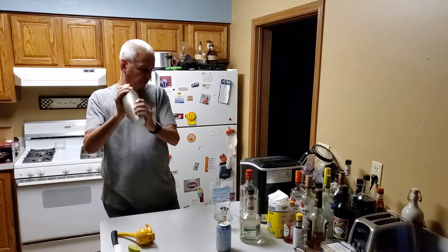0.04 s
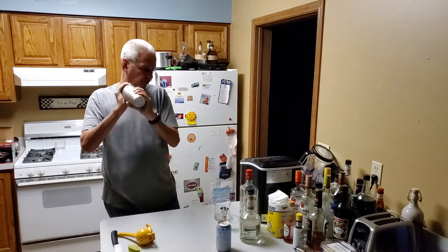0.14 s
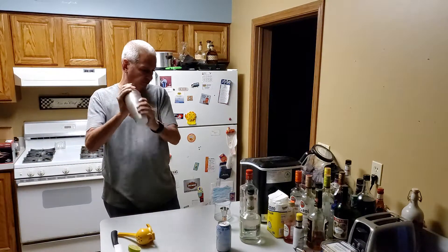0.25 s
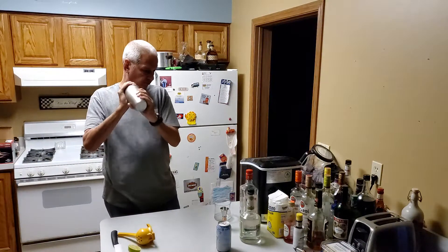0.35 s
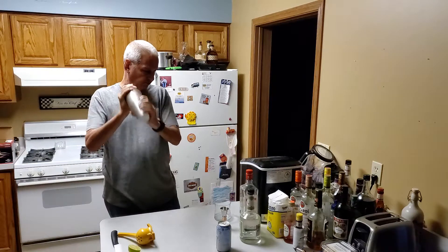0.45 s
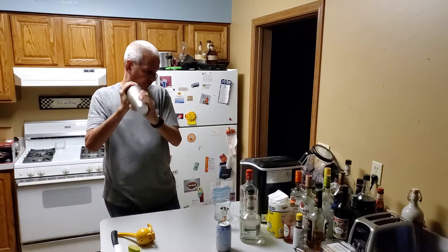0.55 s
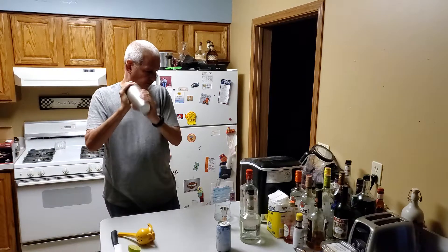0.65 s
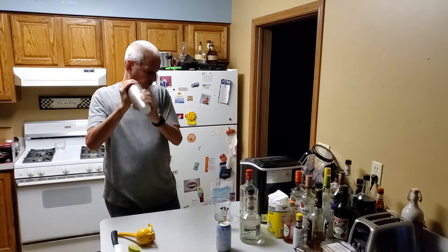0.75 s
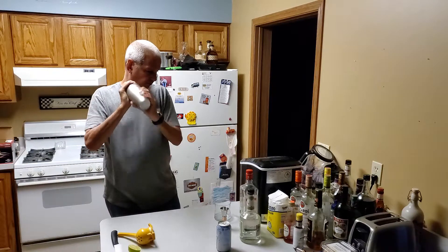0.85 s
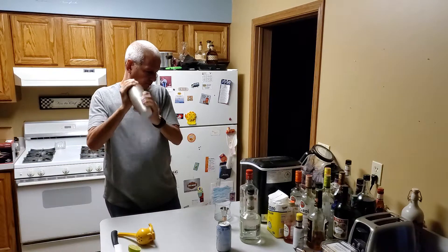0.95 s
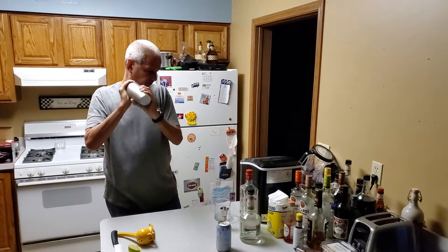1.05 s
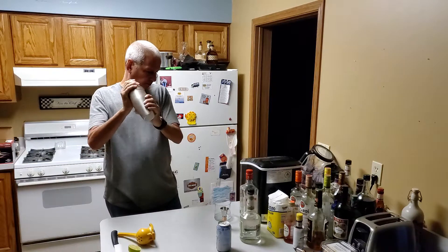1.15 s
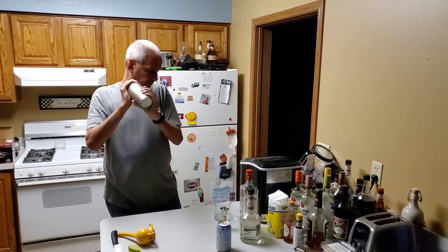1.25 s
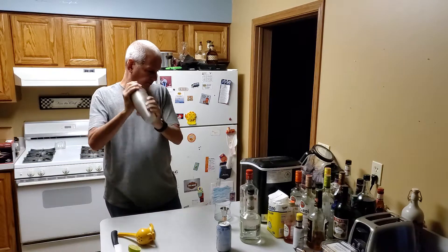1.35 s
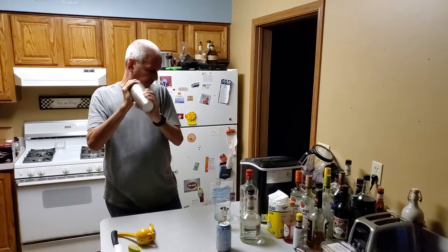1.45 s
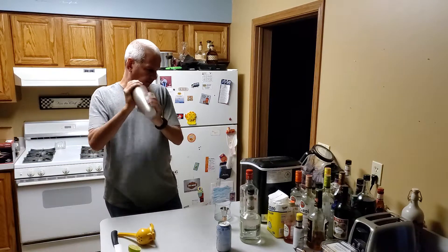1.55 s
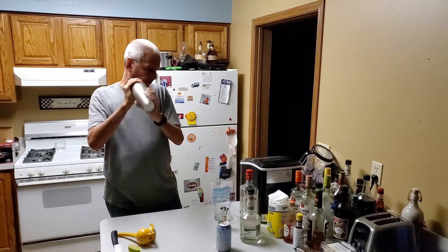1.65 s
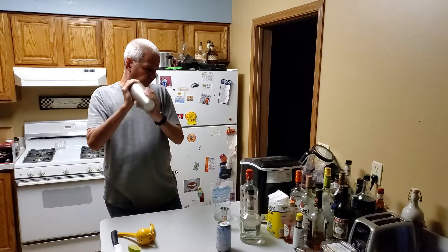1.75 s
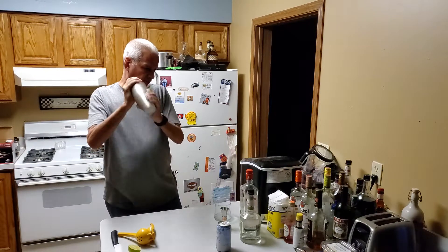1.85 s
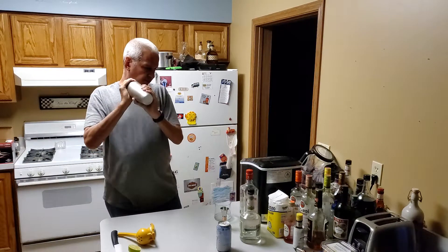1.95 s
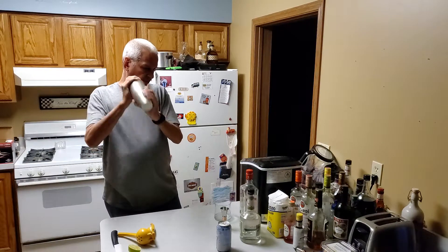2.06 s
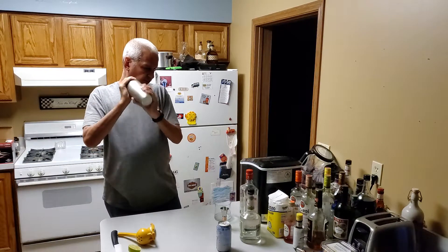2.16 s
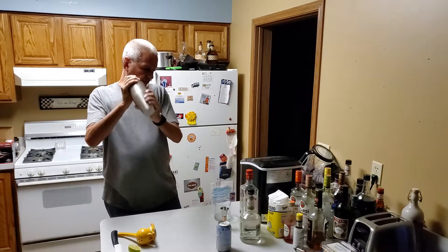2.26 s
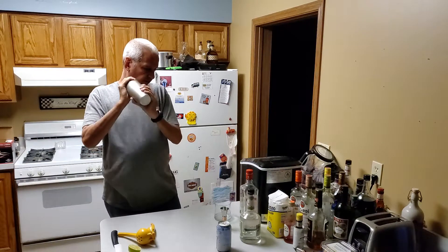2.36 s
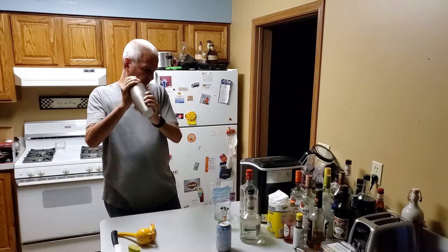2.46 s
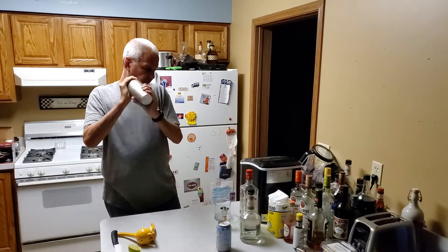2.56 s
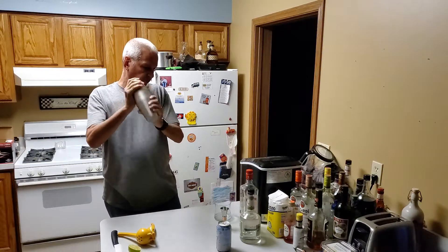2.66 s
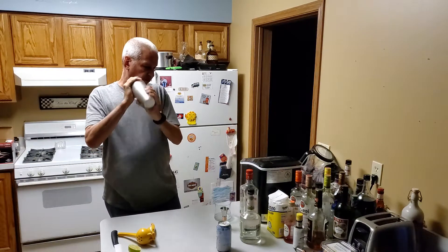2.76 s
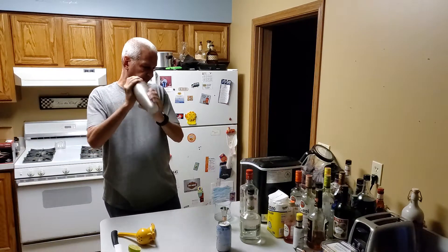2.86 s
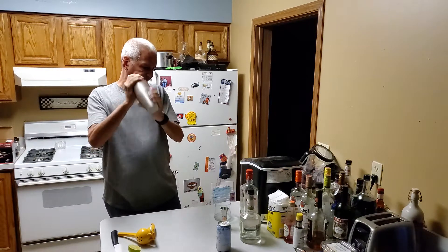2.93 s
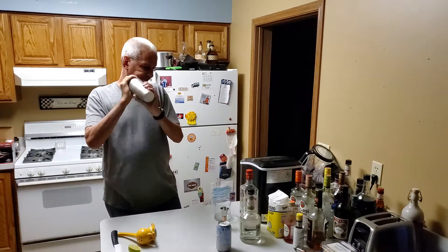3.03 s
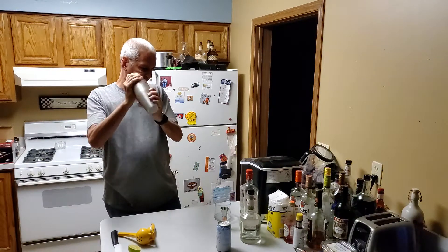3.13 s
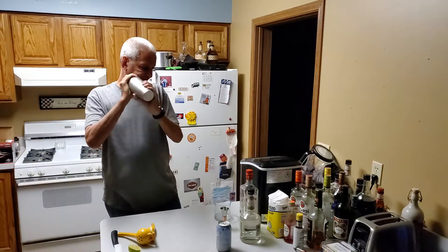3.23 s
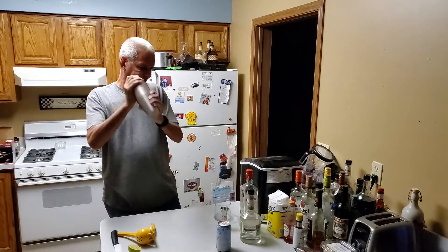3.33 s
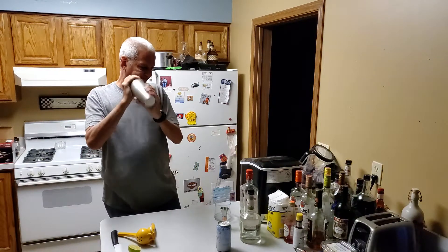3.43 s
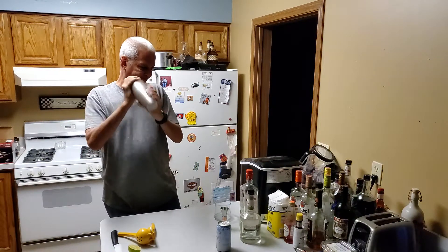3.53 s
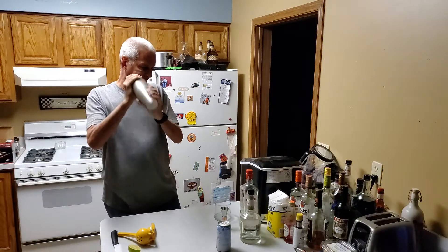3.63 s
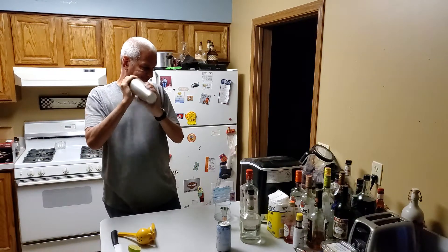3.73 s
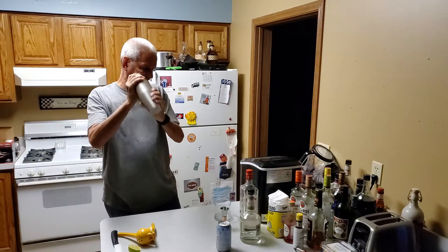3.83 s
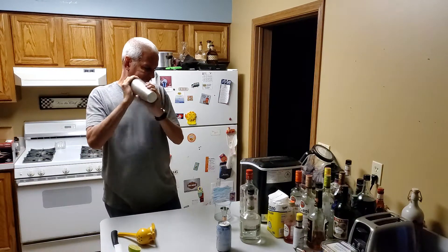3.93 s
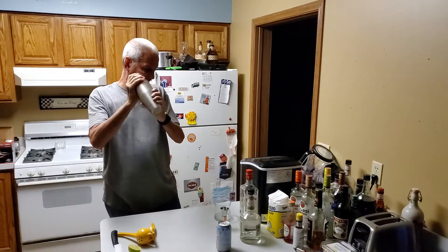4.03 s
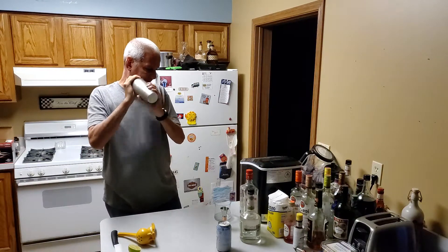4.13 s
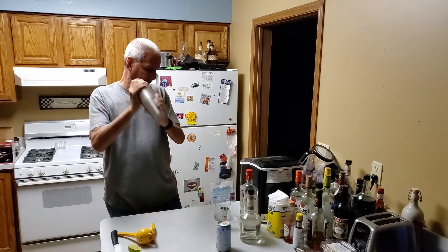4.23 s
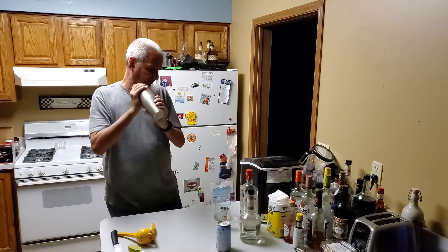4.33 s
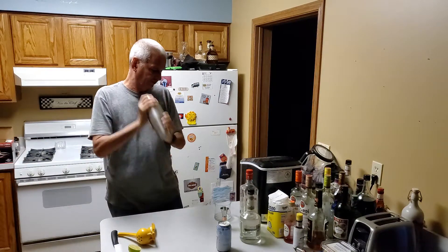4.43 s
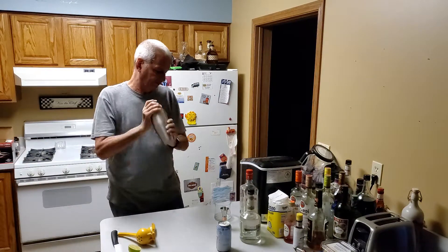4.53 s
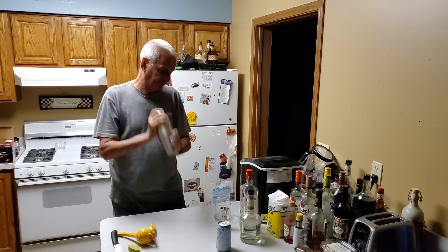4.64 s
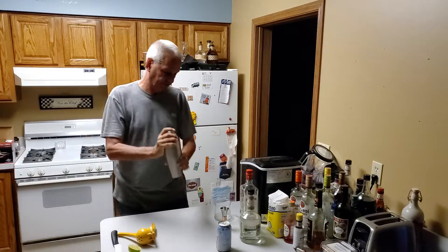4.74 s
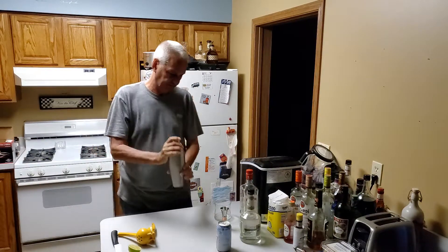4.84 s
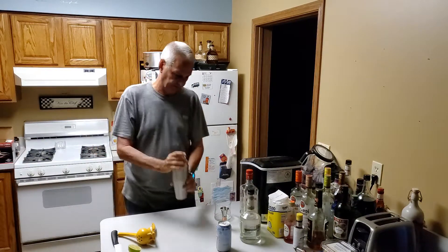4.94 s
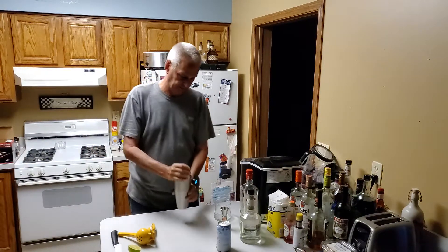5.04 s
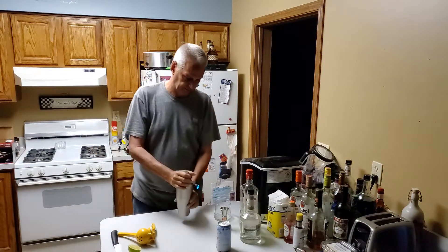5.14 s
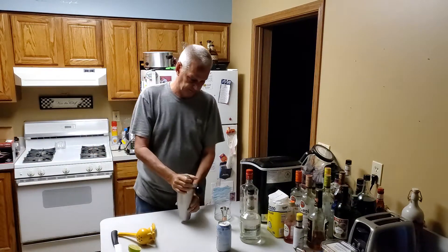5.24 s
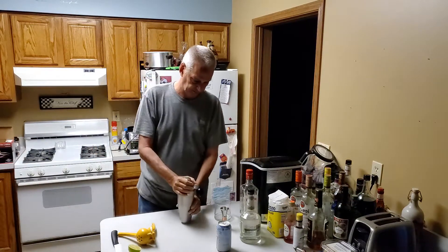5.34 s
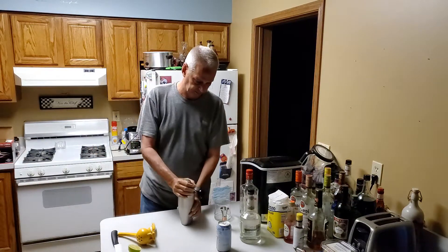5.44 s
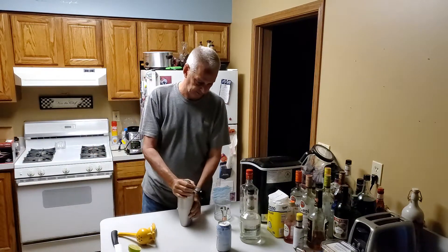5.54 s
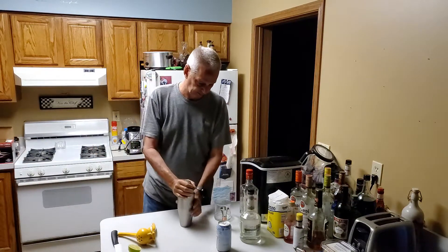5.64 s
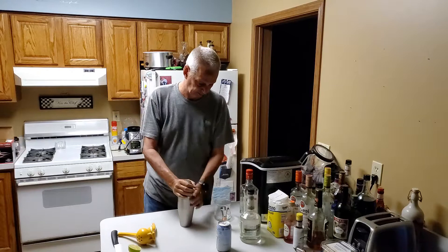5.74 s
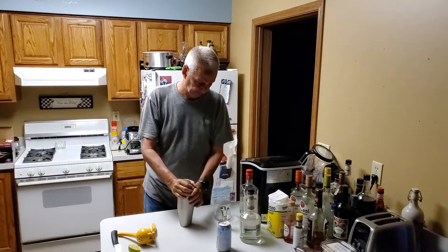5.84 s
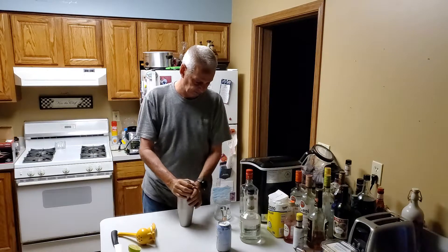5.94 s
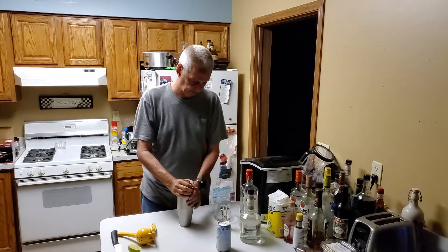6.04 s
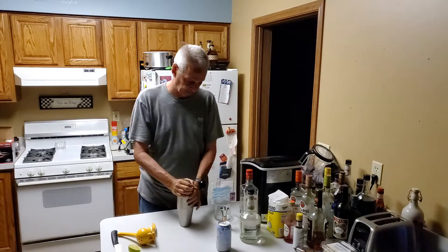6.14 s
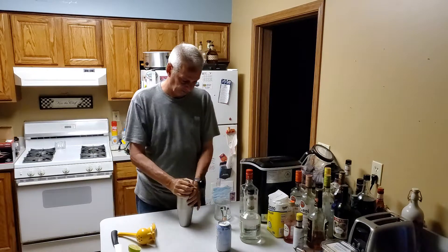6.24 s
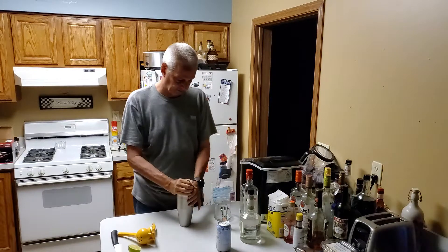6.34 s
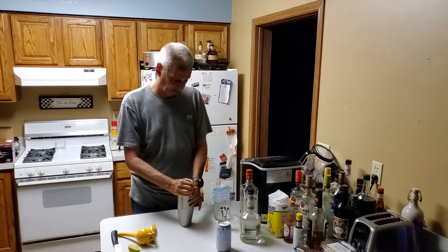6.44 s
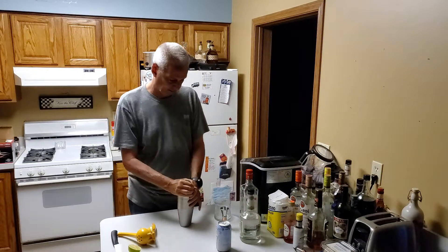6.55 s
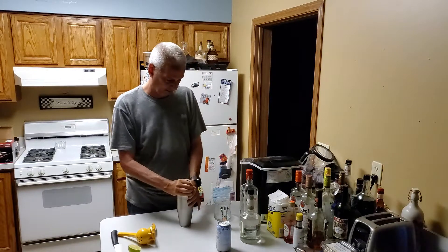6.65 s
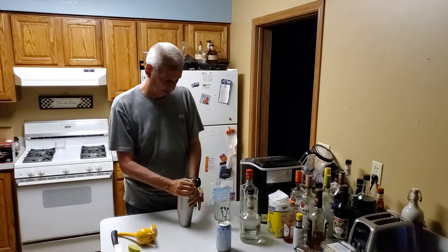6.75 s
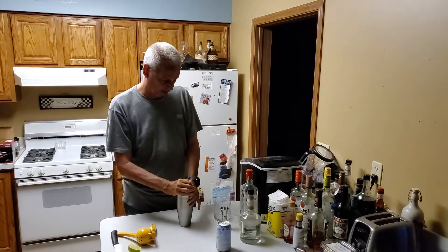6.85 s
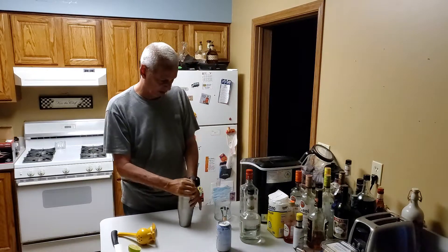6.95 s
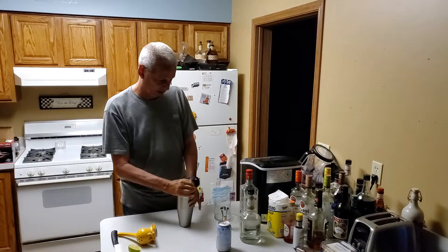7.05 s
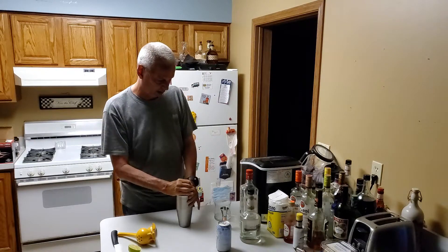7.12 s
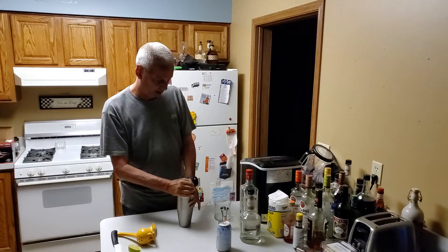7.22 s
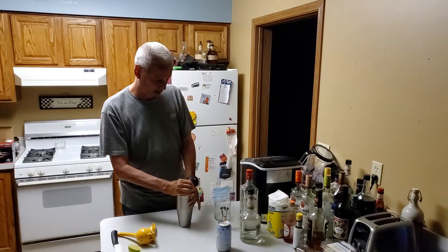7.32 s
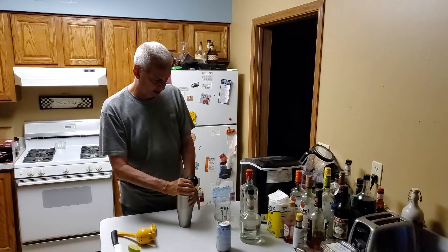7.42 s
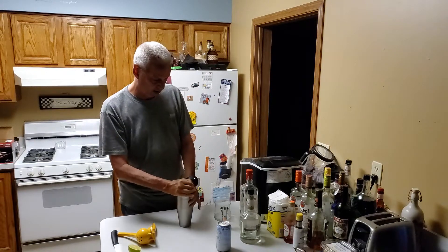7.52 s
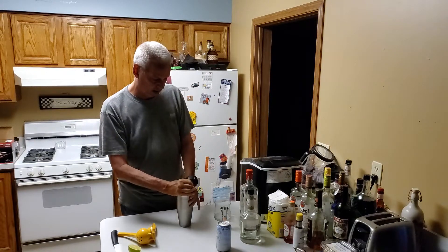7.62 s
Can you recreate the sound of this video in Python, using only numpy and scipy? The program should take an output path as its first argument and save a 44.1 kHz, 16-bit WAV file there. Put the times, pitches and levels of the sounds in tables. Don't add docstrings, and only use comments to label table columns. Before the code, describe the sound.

Ice cubes slam back and forth in a metal shaker, roughly four full shakes a second, crisp, bright and loud, with high pinging clinks over a dense patter. The shaking breaks off, a few cubes clink softly, then the base thuds on the counter and rocks with light knocks and tiny cap clicks. Small stereo microphones, lively kitchen, low refrigerator hum behind.

```python
import sys
import numpy as np
from scipy import signal
from scipy.fft import rfft, irfft
from scipy.io import wavfile
from scipy.ndimage import uniform_filter1d

SR = 44100
rng = np.random.default_rng(int(sys.argv[2]) if len(sys.argv) > 2 else 0)


def dump_mix(stems):
    frames = np.atleast_2d(stems).T
    limited = np.clip(frames, -1, 1)
    pcm = np.round(limited * 32767).astype(np.int16)
    wavfile.write(sys.argv[1], SR, pcm)


def invert_db(x):
    u = np.asarray(x, float) / 20
    return 10 ** u


N = 338670

# (frequency [Hz], level [dB per Hz])
AIR_SPECTRUM = [(30, -21), (45, -20), (70, -1), (100, -23.5), (140, -8.5), (300, -10.5), (600, -12),
                (740, -14), (830, -18.5), (1900, -27.5), (3500, -38), (6000, -46.5), (11000, -39.5),
                (16000, -52)]
AIR_DB = -53
# (frequency [Hz], rms level [dB])
HUM = [(58.12, -54), (58.91, -65), (47.6, -65)]
HUM_TRIM = [0., 0.5, -10.5]
# (multiple of the hum, rms level [dB])
HUM_ORDERS = [(6, -65), (8, -104), (9, -65), (10, -65.5), (12, -69.5)]
# (frequency [Hz], rms level [dB])
WHINES = [(711, -69.5), (973, -71.5), (6860, -85)]
BEAT_S = 0.22

# (time [s], level [dB])
TUMBLE = [(0.0, -30.5), (0.41, -15.5), (0.83, -20), (1.24, -21), (1.92, -20), (2.22, -16.5), (2.8, -20.5),
          (2.95, -26.5), (3.3, -21), (3.61, -17.5), (4.32, -18), (4.62, -17), (4.8, -29), (5.02, -28.5),
          (5.22, -57), (6.08, -60.5), (6.25, -64.5), (7.68, -57.5)]
# (frequency [Hz], level [dB])
CHIP_COLOUR = [(1300, -45), (1700, 16.5), (2300, 2.5), (3200, 6), (5000, -6), (8000, -7.5), (12000, -9),
               (16000, -17.5)]
DULL_DB, DULL_FOLLOW = -29.5, 0.75
CRACK_TONE_DB = 3.5

# (time [s], chips [dB], ring [dB], ring centre [Hz], breadth [octaves])
BASE_HITS = [(0.0, -14.5, -19.5, 995, 0.39), (0.187, -8.5, -4.5, 1530, 0.45),
             (0.402, -9.5, -2, 1450, 0.089), (0.642, -12.5, -12.5, 1590, 0.24),
             (0.831, -9.5, -12, 1690, 0.06), (1.072, -12, -13.5, 1150, 0.54),
             (1.272, -15.5, -18, 1650, 0.93), (1.538, -28, -14.5, 1360, 0.61),
             (1.736, -17, -21.5, 1100, 0.42), (1.939, -6.5, -6, 1850, 0.4),
             (2.179, -13.5, -4.5, 1150, 0.88), (2.375, -12, -28, 1660, 1),
             (2.632, -20.5, -19.5, 1070, 0.73), (2.827, -8.5, -3.5, 1330, 0.19),
             (3.076, -12.5, -7.5, 1303, 0.11), (3.301, -23, -12.5, 1200, 1),
             (3.525, -14.5, -12.5, 1510, 0.32), (3.727, -14, -14, 1320, 0.15),
             (3.96, -9.5, -12.5, 1460, 0.97), (4.186, -10, -15, 1340, 0.38), (4.405, -10, -7, 1450, 0.25),
             (4.623, -15, -12.5, 2340, 0.41)]
BASE_DULL_DB, BASE_CRACK_DB, BASE_UPPER_DB = -8, -6, -5
TIGHT_S, LOOSEN = 0.013, 0.3
# (time [s], chips [dB], spread [s], first crack [dB])
CAP_HITS = [(0.1015, -16, 0.096, -9), (0.2778, -10.5, 0.031, -11), (0.53, -13.5, 0.0093, -6),
            (0.715, -16.5, 0.11, -3.5), (0.935, -13, 0.045, -27), (1.1643, -19, 0.042, -18),
            (1.4056, -10.5, 0.019, -37), (1.522, -9, 0.013, -25), (1.6337, -20, 0.073, -14),
            (1.8255, -10, 0.014, -26), (2.0606, -9, 0.012, -21), (2.328, -21, 0.051, -16),
            (2.5015, -17, 0.037, 1), (2.7348, -15, 0.01, 4.5), (2.958, -16.5, 0.075, -8),
            (3.156, -14, 0.041, -10), (3.381, -7, 0.0063, -2), (3.6686, -19, 0.025, -5),
            (3.839, -26, .038, -12), (4.064, -17.5, 0.048, 1.5), (4.2975, -19.5, 0.028, -13),
            (4.5011, -10, 0.012, -9), (4.7265, -11.5, 0.027, -22), (4.834, -20, 0.041, -17)]
CAP_DULL_DB = -9.5
# (time [s], chips [dB], dull against bright [dB], spread [s])
STRAYS = [(0.0677, -26, -26, .01), (0.0767, -12.5, -14, 0.013), (0.853, -22.5, -12, .01),
          (1.02, -18, -30, .01), (1.0572, -12.5, -13, 0.014), (1.8142, -17, -16.5, .01),
          (4.1958, -14, -17, .012), (4.33, -24, -25, 0.0098), (4.4165, -25.5, -7.5, 0.013),
          (0.159, -21, -25, 0.079), (0.383, -28, -2, 0.035), (0.57, -21, -9, 0.055),
          (0.598, -18, -14, 0.013), (0.795, -15, -13, 0.017), (1.215, -12, -20.5, 0.015),
          (1.389, -19.5, -10.5, 0.07), (1.597, -18.5, -26.5, 0.035), (1.7094, -15.5, -11, 0.026),
          (1.869, -14.5, -11, 0.031), (2.6463, -43, -18, 0.011), (2.828, -14, -22, .004),
          (2.7675, -19.5, -8.5, 0.016), (3.1794, -11, -22, 0.01), (3.27, -22.5, -3, 0.02),
          (3.317, -12.5, -12, 0.0069), (3.475, -18.5, -14, .06), (3.8257, -14.5, -11, 0.022),
          (4.392, -38, -6, .02)]
STRAY_CRACK_DB = 2
# (time [s], peak level [dB], dull against bright [dB])
TICKS = [(5.0443, -32.5, 5), (5.15, -37, 7), (5.276, -45, -3), (5.379, -42.5, -3), (5.4282, -40, -2.5),
         (5.5765, -45, 1), (5.708, -56, 0), (5.744, -59, 10.5), (5.828, -43.5, 3), (5.924, -61, 12),
         (5.956, -41, -22), (6.349, -60, -9), (6.3887, -40.5, -4.5), (6.555, -51, 0), (6.675, -51, 9),
         (6.823, -49.5, 2), (6.8886, -56, 7), (7.0624, -41, -8), (7.1335, -64, -10), (7.1893, -41.5, -5),
         (7.432, -44, -6), (7.598, -45, 2), (7.602, -45, 5.5)]
TICK_S, TICK_CRACK_DB = 0.0062, -4.5

# (frequency [Hz], level [dB], T60 [s])
SHELL_MODES = [(467, -7.5, 0.027), (700, -7.5, 0.03), (970, -0.5, 0.056), (1154.5, 13, 0.041),
               (1360, 4.5, 0.027), (1450, 11.5, 0.023), (1536, 18, 0.015), (1660, 13, 0.02),
               (1850, 7.5, 0.033), (2113, 5.5, 0.047), (2230, 12.5, 0.018), (2660, 6, 0.023),
               (2876, 4.5, 0.046), (3190, 7, 0.027)]
# (time [s],
# ring [dB], ring centre [Hz])
GLANCES = [(0.4025, -16, 1340), (0.601, -18, 1610), (0.774, -17, 2470), (1.128, -38, 1600),
           (1.940, -31.5, 2600), (2.1805, -21.5, 2500), (2.828, -20, 2600), (3.033, -19.5, 1710),
           (3.189, -19, 2260), (3.66, -19.5, 1660), (3.864, -21.5, 1920), (4.727, -15, 2590),
           (0.834, -13, 1580), (3.382, -32, 2400), (4.502, -30, 2300)]
GLANCE_OCTAVES, GLANCE_UPPER_DB = 0.18, 11
# (time [s], ring [dB], ring centre [Hz])
THUDS = [(0.2, -22, 606), (0.415, -30, 600), (1.541, -25.5, 520), (1.96, -18.5, 660), (2.192, -19.5, 605),
         (3.31, -28, 640), (3.527, -24.5, 520), (3.74, -28, 600), (3.97, -25, 700), (4.2, -34, 600),
         (4.63, -27, 790)]
THUD_OCTAVES, THUD_UPPER_DB = 0.42, -27
MUFFLE_S, MUFFLE_HZ, MUFFLE_DB = 4.95, 9000, -16

# (frequency [Hz], T60 [s])
KITCHEN_T60 = [(100, 0.56), (500, 0.5), (1500, 0.41), (4000, 0.56), (10000, 0.21), (16000, 0.11)]
# (frequency [Hz], correlation [-1 to 1])
LIKENESS = [(60, 0.77), (180, 1), (550, 0.67), (1650, -0.11), (4970, -0.03), (15000, -0.0017)]
WALL_S, WALL_DB = [0.0128, 0.015], -10.5
SWAP_S = 0.17

# (multiple of the pitch, level [dB], multiple of the T60)
CLINK_MODES = [(.92, -25, .7), (1, -4.5, 1), (1.06, -15, 0.97), (1.45, -33.5, .6), (1.95, -15, 0.54)]
# (time [s], peak level [dB], pitch [Hz])
NECK_CLINKS = [(0.07, -27, 6670), (0.1605, -23, 6650), (0.188, -13, 6700), (0.2767, -15, 5880),
               (0.297, -16.5, 7170), (0.3855, -22, 6660), (0.401, -20.5, 6650), (0.5325, -9, 5230),
               (0.5696, -17, 6760), (0.598, -14.5, 5130), (0.7145, -17, 6500), (0.7911, -12.5, 6760),
               (0.7986, -17, 6600), (0.9395, -17, 7000), (1.057, -19, 6830), (1.1673, -14, 5970),
               (1.1826, -16, 6700), (1.3877, -19, 6200), (1.408, -11, 6510), (1.4127, -5, 5500),
               (1.5978, -25, 6690), (1.6347, -12, 6550), (1.711, -22, 6700), (1.8113, -14, 6470),
               (1.8302, -13, 6090), (1.8712, -12, 6380), (1.937, -27, 6360), (2.059, -8, 5970),
               (2.0782, -23, 6520), (2.1904, -24, 4950), (2.3795, -28, 6870), (2.4992, -21, 6700),
               (2.4998, -11, 6170), (2.6454, -12, 5220), (2.7347, -10.5, 6400), (2.7696, -15, 6230),
               (2.826, -27, 5900), (2.957, -12, 6360), (3.1557, -15, 5350), (3.1792, -14, 5270),
               (3.268, -30, 5750), (3.3189, -21, 5870), (3.3827, -25, 6500), (3.3844, -15, 6660),
               (3.6701, -14, 6500), (3.701, -13, 6510), (3.7224, -18, 6540), (3.826, -12, 5970),
               (3.8404, -7.5, 6870), (3.9589, -29, 6330), (4.0654, -14, 6700), (4.2048, -24, 5570),
               (4.3173, -15, 6700), (4.394, -19, 6070), (4.5027, -28, 6280), (4.5101, -16, 6700),
               (4.7272, -14, 6550), (4.8314, -18.5, 6140)]
# (time [s], peak level [dB], pitch [Hz])
NECK_RATTLE = [(0.2763, -14.5, 5880), (0.2962, -18, 7100), (1.4174, -12, 6960), (1.4214, -12, 6700),
               (1.4264, -17, 6100), (1.4334, -13, 6240), (1.4384, -20, 5670), (2.0834, -14, 6540),
               (3.1557, -13, 5350), (3.1854, -16, 6520), (3.1974, -22, 5520), (3.3874, -15, 7320),
               (3.3934, -15, 6690), (3.5274, -15, 6330), (4.5234, -19, 6650), (4.7272, -16, 6550),
               (4.7654, -17, 6950), (4.9244, -29, 6310)]
NECK_T60_S, NECK_DB = 0.0059, -4.5
# (time [s], peak level [dB], pitch [Hz])
SHOULDER_CLINKS = [(0.0777, -29, 2270), (0.5327, -9, 3280), (0.82, -32, 1570), (1.4162, -18, 3060),
                   (1.4334, -18, 1720), (2.0697, -17, 3360), (2.5042, -11, 2320), (2.6618, -36, 3080),
                   (2.7324, -25.5, 1700), (3.0325, -17, 3390), (3.1104, -21, 3470), (3.1877, -20, 3180),
                   (3.4994, -24, 2240), (3.6177, -29, 2230), (3.7065, -31, 1490), (3.8227, -11, 3370),
                   (3.9739, -14, 2160), (4.1944, -14, 1380), (4.3374, -16, 3430), (4.4044, -31, 1510),
                   (4.5241, -11, 3240), (4.7794, -26, 1630), (4.8594, -21, 1500), (4.8994, -20, 2300),
                   (4.9944, -17.5, 1900)]
SHOULDER_T60_S, SHOULDER_DB = 0.012, -3
# (time [s], peak level [dB], pitch [Hz])
FREE_CLINKS = [
    (4.6226, -36, 2270),
    (4.648, -17.5, 2220),
    (5.0445, -32.5, 1670),
    (5.1190, -37, 1860),
    (5.1495, -36, 1740),
]
FREE_T60_S = 0.046
# (time [s], peak level [dB], pitch [Hz])
CAP_CLICKS = [(5.3793, -36, 2390), (5.4296, -38, 2860), (5.7423, -59, 2350), (5.8267, -42, 3460),
              (5.9244, -53, 2680), (5.278, -51, 1790), (5.709, -43, 1630), (5.831, -46, 2020),
              (5.955, -49, 1820), (6.201, -56, 1920), (6.617, -49, 1680), (7.134, -53, 1940),
              (7.189, -46.5, 3290), (7.324, -35, 1840), (7.441, -52, 3500), (6.3875, -45, 2890),
              (6.5545, -50, 3130), (6.8259, -41, 3070), (7.0600, -40, 3190), (7.4333, -44, 3320)]
GRIP_T60_S, CHATTER_S = 0.0055, 0.0033

# (time [s], peak level [dB], hardness [dB], boom [dB], favoured ring [Hz])
KNOCKS = [(5.573, -17, -28, -20, 340), (5.685, -47, -32, -12, 200), (6.39, -41.5, -24, -15, 300),
          (6.678, -29.5, -34, -17.5, 282), (6.827, -42, -22, -15, 300), (6.904, -31.5, -21, -25, 262),
          (6.941, -43.5, -40, -8, 200), (7.195, -34, -34, -8, 240), (7.204, -32, -21, -13, 296),
          (7.221, -34, -40, 3, 230), (7.443, -34.5, -32, -12, 398), (7.469, -46, -18, -9, 250),
          (7.484, -45, -40, -12, 198), (7.602, -15.5, -18, -20, 260)]
# (frequency [Hz], level [dB], T60 [s])
COUNTER_MODES = [(93.4, 5, 0.38), (137, 4, 0.28), (250, 1, 0.12), (321, 8.5, 0.034), (386, -1, 0.063),
                 (447, 1, 0.05), (520, 4.5, 0.041), (605, 9, 0.04), (727, 2, 0.056), (867, 0.5, 0.094),
                 (1150, 7, 0.021), (1660, 7.5, 0.0073), (2090, 4.5, 0.005), (2830, -8, 0.0024)]
KNOCK_SPREAD_S, KNOCK_CONTACT_S = 0.006, 0.0006
KNOCK_HOLD_S, KNOCK_FALL_DB_PER_S = 0.052, -500

# (frequency [Hz], level [dB])
LEFT_PORT = [(500, -2.5), (2000, -1.5), (3100, 4), (5000, 0.5), (7800, 4.5), (9200, -6.5), (12000, -5),
             (16000, 1.5)]
# (frequency [Hz], level [dB])
RIGHT_PORT = [(2000, -0.5), (5000, 2.5), (6500, 6), (7600, 1), (8800, 1), (9600, 7), (11500, 5.5),
              (13500, 2.5)]
LEFT_LAG, DOWN_LAG, DOWN_S = 6, 3, 5.25


def evened(x):
    return x / np.sqrt(np.mean(x ** 2) + 1e-20)


def read(points, hz):
    f, value = np.transpose(points)
    return np.interp(np.log(hz + 1), np.log(f + 1), value)


def add(mix, s, sound):
    part = mix[round(s * SR):][:len(sound)]
    part += sound[:len(part)]


def high_pass(x, order, hz):
    return signal.sosfilt(signal.butter(order, hz, "high", fs=SR, output="sos"), x)


def paired(a, b, hz):
    same = np.clip(read(LIKENESS, hz), -1, 1)[:, None]
    return np.array([a, same * a + np.sqrt(1 - same ** 2) * b])


def ring(modes, weight, rise_cycles=0.01):
    hz, db, t60 = np.transpose(modes)[:, :, None]
    t = np.arange(round(0.3 * SR)) / SR
    rise = 1 - np.exp(-hz * t / rise_cycles)
    decay = invert_db(db - 60 * t / t60)
    return (weight[:, None] * rise * decay * np.sin(2 * np.pi * hz * t)).sum(0)


def blows(spread_s, contact_s, draw, rest=1):
    train = np.zeros(round(spread_s * SR * 4) + 2)
    train[0] = 1
    at = (draw[:6] * (len(train) - 1)).astype(int)
    np.add.at(train, at, rest * (draw[6:12] - 0.3) * np.exp(-at / (spread_s * SR + 1)))
    u = np.arange(200) / SR / contact_s
    return np.convolve(train, np.exp(-0.5 * (3 * u - 3) ** 2))


def fridge():
    frames, hz = N // 512 + 5, np.fft.rfftfreq(2048, 1 / SR)
    a, b, c, d, patches = rng.standard_normal((frames, 1025, 5)).T
    patches = evened(uniform_filter1d(uniform_filter1d(patches, 10, 0), 5, 1))
    colour = invert_db(read(AIR_SPECTRUM, hz)[:, None] + 2.0 * patches)
    wash = paired(a + 1j * b, c + 1j * d, hz) * colour
    air = invert_db(AIR_DB) * evened(signal.istft(wash, nperseg=2048, noverlap=1536)[1][:, :N])
    t = np.arange(N) / SR
    hum = np.zeros(N)
    for (f, db), trim in zip(HUM, HUM_TRIM):
        hum += invert_db(db + trim) * np.sin(2 * np.pi * f * (t - BEAT_S))
    orders = [(round(k) * HUM[0][0], db) for k, db in HUM_ORDERS]
    for f, db in orders + list(WHINES):
        hum += invert_db(db) * np.sin(2 * np.pi * (f * t + rng.random()))
    return air + np.sqrt(2) * hum


def landings():
    base = [(s, db, BASE_DULL_DB, TIGHT_S * invert_db(-LOOSEN * ring_db), BASE_CRACK_DB)
            for s, db, ring_db, _, _ in BASE_HITS]
    cap = [(s, db, CAP_DULL_DB, spread_s, crack_db) for s, db, spread_s, crack_db in CAP_HITS]
    strays = [(*row, STRAY_CRACK_DB) for row in STRAYS]
    ticks = [(*row, TICK_S, TICK_CRACK_DB) for row in TICKS]
    return base + cap + strays + ticks


def chips():
    count, per_s, cycles, split_hz = 40, 3200, 2.68, 4300
    t = np.arange(N) / SR
    effort_db = np.interp(t, *np.transpose(TUMBLE))
    dull_effort_db = DULL_DB + DULL_FOLLOW * (effort_db + 22.5)
    bright = invert_db(effort_db - 10.0) ** 2
    dull = invert_db(dull_effort_db - 10.0) ** 2
    u = np.arange(round(0.25 * SR)) / SR
    for s, db, dull_db, spread_s, _ in landings():
        swell = invert_db(2 * (db - 7.5)) * np.exp(-u / spread_s)
        add(bright, s, swell)
        add(dull, s, swell * invert_db(2 * dull_db))

    size = invert_db(3.0 * np.minimum(rng.exponential(1, (2, N)), 4))
    size *= rng.random((2, N)) < per_s / SR
    size *= invert_db(2.5 * evened(uniform_filter1d(rng.standard_normal(N), 260)))
    size = evened(size * rng.choice([-1, 1], (2, N)))

    s, db, dull_db, _, crack_db = np.transpose(landings())
    late = rng.integers(0, 40, (len(s), count))
    tone = evened(uniform_filter1d(rng.standard_normal((len(s), count)), 4))
    colour = invert_db(CRACK_TONE_DB * tone)
    which, out = rng.integers(0, count, (2, N)), np.zeros((2, N))
    for k, hz in enumerate(np.geomspace(1400, 15500, count)):
        taps = size * np.sqrt(bright if hz > split_hz else dull) * (which == k)
        crack = invert_db(db - 9.0 + crack_db + (hz < split_hz) * (dull_db + 6.5))
        taps[:, (s * SR).astype(int) + late[:, k]] += colour[:, k] * crack
        r, w = np.exp(-np.pi * hz / cycles / SR), 2 * np.pi * hz / SR
        ping = signal.lfilter([1, 0, -1], [1, -2 * r * np.cos(w), r * r], taps) * np.sqrt(1 - r * r)
        muffle = invert_db(MUFFLE_DB * max(np.log2(hz / MUFFLE_HZ), 0) * (t > MUFFLE_S))
        out += invert_db(read(CHIP_COLOUR, hz) - 4) * np.sqrt(hz / 5000) * ping * muffle
    return out


def rings():
    base = [(s, db, hz, octaves, BASE_UPPER_DB) for s, _, db, hz, octaves in BASE_HITS]
    glances = [(*row, GLANCE_OCTAVES, GLANCE_UPPER_DB) for row in GLANCES]
    thuds = [(*row, THUD_OCTAVES, THUD_UPPER_DB) for row in THUDS]
    return base + glances + thuds


def slams():
    out, hz, count = np.zeros(N), np.transpose(SHELL_MODES)[0], len(SHELL_MODES)
    draws = rng.random((len(rings()), 12 + 2 * count))
    for (s, db, centre_hz, octaves, upper_db), draw in zip(rings(), draws):
        near = np.exp(-0.5 * (np.log2(hz / centre_hz) / octaves) ** 2)
        weight = invert_db(upper_db - 8.0) * (hz > 1800) + 0.013 + near
        weight *= 0.51 + 0.82 * draw[12:12 + count]
        detune = 1 + 0.04 * (draw[-count:] - 0.5)
        modes = SHELL_MODES * np.c_[detune, np.ones((count, 2))]
        strike = blows(0.003 * invert_db(-LOOSEN * db), 0.00006, draw, 0.4)
        sound = signal.oaconvolve(ring(modes, weight, 1.1), strike)
        add(out, s, invert_db(db - 5.5) * sound / abs(sound).max())
    return out


def kitchen(x):
    out, size, count = np.zeros((2, N)), 18000, 3
    for k in range(count):
        taps = np.zeros((2, size))
        at = np.arange(160, size - 20, 20) + rng.integers(0, 20, (2, (size - 161) // 20))
        np.put_along_axis(taps, at, rng.choice([-1., 1.], at.shape), 1)
        hz, t, z = signal.stft(taps, SR, nperseg=256)
        fall_db = -60 * t / read(KITCHEN_T60, hz)[:, None]
        fall_db += -5 * (t > 0.065)
        fall_db += 3 * np.exp(-t / 0.023) + 5 * np.exp(-t / 0.004)
        tail = signal.istft(paired(*z, hz) * invert_db(fall_db), SR, nperseg=256)[1]
        tail /= np.linalg.norm(tail[0])
        tail[[0, 1], (np.array(WALL_S) * SR).astype(int)] += invert_db(WALL_DB)
        share = np.sqrt(2 / count) * np.cos(np.pi * (np.arange(N) / SR / SWAP_S + k / count))
        out += signal.oaconvolve((share * x)[None], tail, axes=1)[:, :N]
    return out


def clinks():
    out, (ratio, trim_db, longer) = np.zeros(N), np.transpose(CLINK_MODES)
    kinds = ((FREE_CLINKS, FREE_T60_S, 0), (CAP_CLICKS, GRIP_T60_S, 0),
             (SHOULDER_CLINKS, SHOULDER_T60_S, SHOULDER_DB),
             (list(NECK_CLINKS) + list(NECK_RATTLE), NECK_T60_S, NECK_DB))
    for rows, t60, kind_db in kinds:
        for (s, db, hz), draw in zip(rows, rng.random((len(rows), 12))):
            modes = np.c_[ratio * hz, db + kind_db + trim_db, longer * t60]
            tone = ring(modes, np.ones(len(modes)), 2.5)[:4000]
            add(out, s, signal.oaconvolve(tone, blows(CHATTER_S, 0.00004, draw)))
    return out


def knocks():
    out, hz = np.zeros(N), np.transpose(COUNTER_MODES)[0]
    draws = rng.random((len(KNOCKS), 12 + len(hz)))
    for (s, db, hard_db, boom_db, ring_hz), draw in zip(KNOCKS, draws):
        favoured = np.exp(-0.5 * (np.log2(hz / ring_hz) / 0.35) ** 2)
        weight = (0.32 + 0.98 * draw[12:]) * (0.88 + favoured)
        boom = invert_db((hz < 160) * (boom_db + 15.5))
        push = ring(COUNTER_MODES, -weight * (hz < 1000) * boom, 0.27)
        edge = ring(COUNTER_MODES, weight * (hz > 1000) * invert_db(hard_db + 32))
        sound = signal.oaconvolve(push, blows(KNOCK_SPREAD_S, KNOCK_CONTACT_S, draw, 0.39))
        sound += signal.oaconvolve(edge, blows(KNOCK_SPREAD_S, 0.38 * KNOCK_CONTACT_S, draw, 0.2))
        sound *= invert_db(KNOCK_FALL_DB_PER_S * np.maximum(np.arange(len(sound)) / SR - KNOCK_HOLD_S, 0))
        add(out, s, invert_db(db - 0.5) * sound / abs(sound).max())
    return out


def scene():
    (front, back), slam, clink, counter = chips(), slams(), clinks(), knocks()
    slam = high_pass(slam, 3, 420)
    counter = high_pass(counter, 3, 70)
    rap = high_pass(counter, 2, 210)
    body = invert_db(-1.5) * slam + invert_db(4.5) * clink + invert_db(4.5) * counter
    shared = 0.18
    left_chips = shared * front + np.sqrt(1 - shared ** 2) * back
    left = invert_db(1.9) * body + invert_db(1.5) * left_chips
    n = np.arange(N)
    left = left[n - np.where(n < DOWN_S * SR, LEFT_LAG, DOWN_LAG)]
    right = body + invert_db(-1.0) * front
    near = np.array([left, right])
    wet = kitchen(front + invert_db(3.0) * slam + invert_db(2.5) * clink + invert_db(3.5) * rap)
    hz = np.fft.rfftfreq(N, 1 / SR)
    ports = invert_db([read(LEFT_PORT, hz), read(RIGHT_PORT, hz)])
    lean = invert_db([[-8], [4]]) ** (hz > 8800)
    return irfft(rfft(near + wet) * ports + rfft(fridge()) * lean, N)


def band_limit(x):
    return signal.sosfilt(signal.butter(12, 16830, fs=SR, output="sos"), x)


def record(dry):
    low_pass = signal.firwin(1023, 15980, window=("kaiser", 9), fs=SR)
    limited = signal.oaconvolve(dry, low_pass[None], "same")
    return band_limit(limited)


dry = scene()
out = record(dry)
dump_mix(out)
```